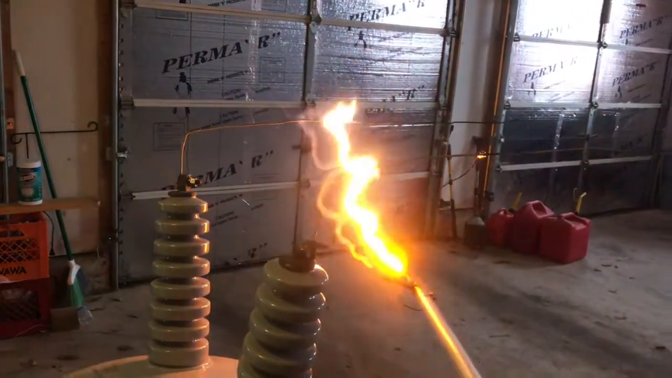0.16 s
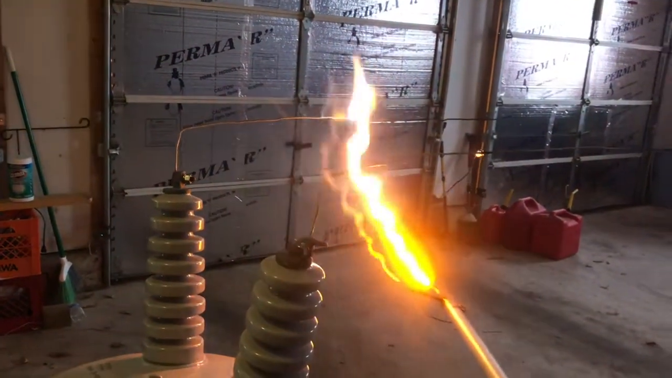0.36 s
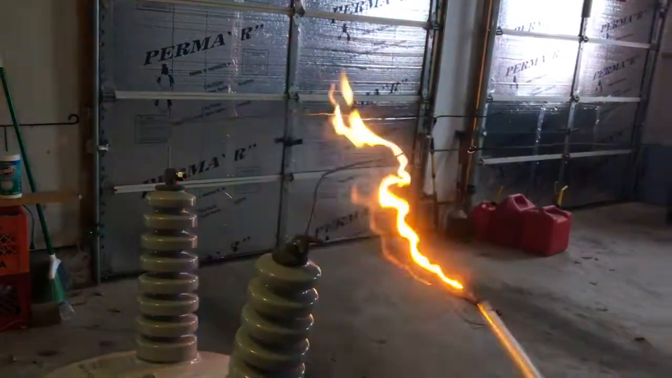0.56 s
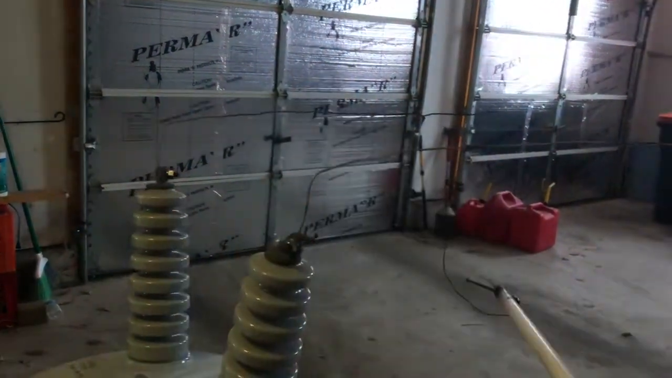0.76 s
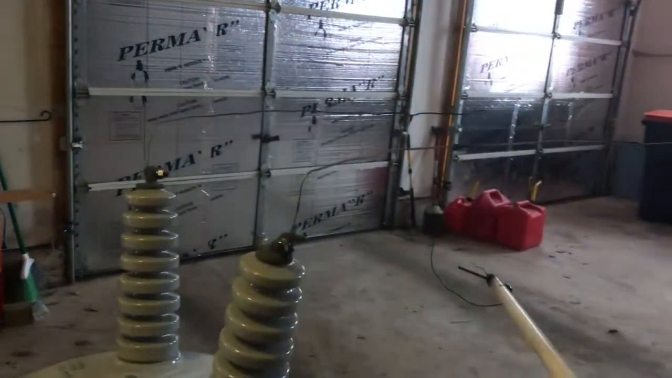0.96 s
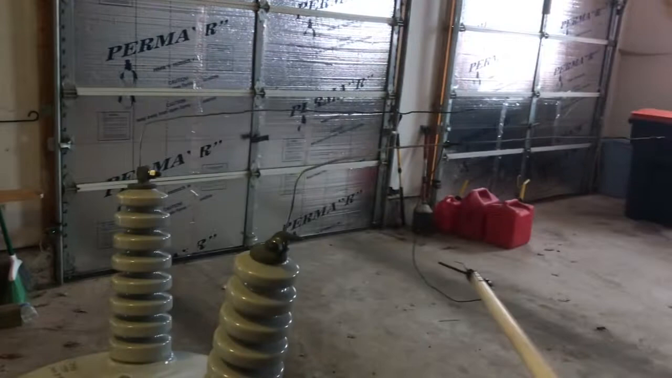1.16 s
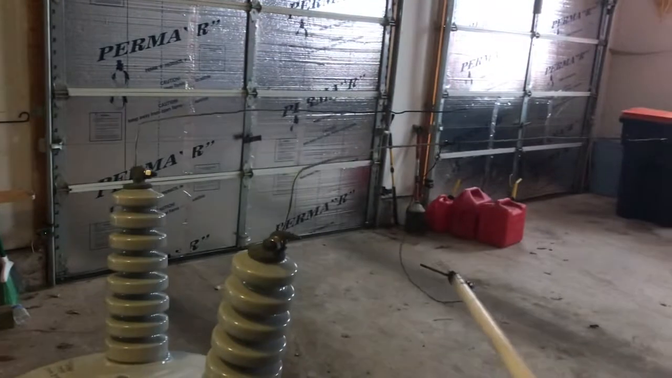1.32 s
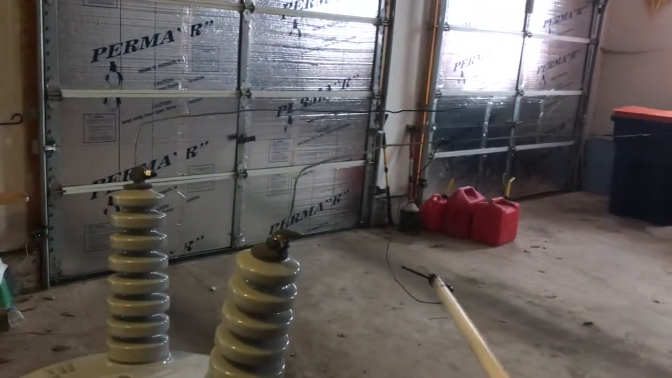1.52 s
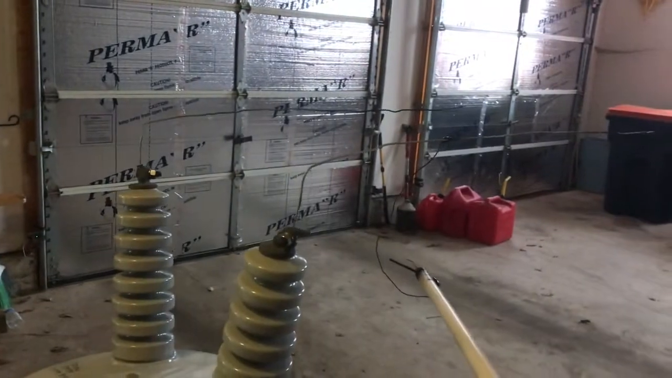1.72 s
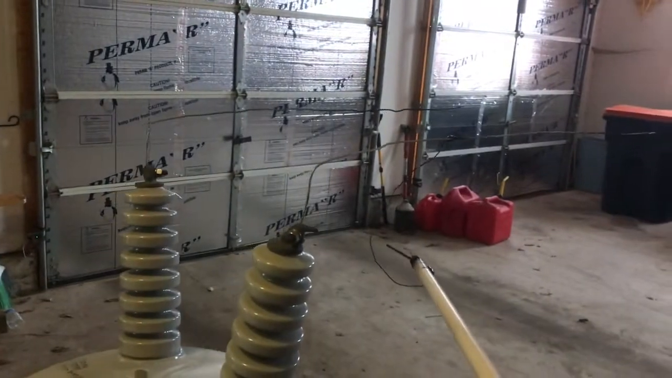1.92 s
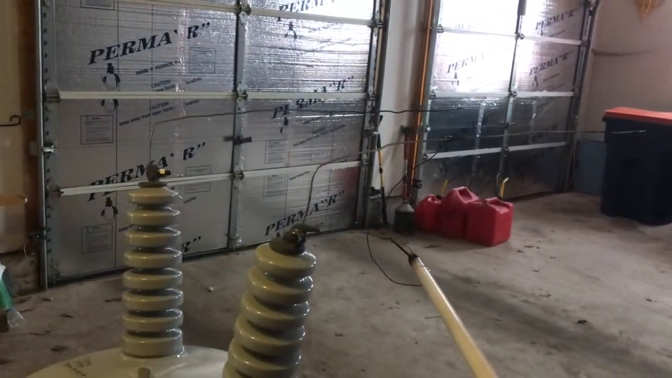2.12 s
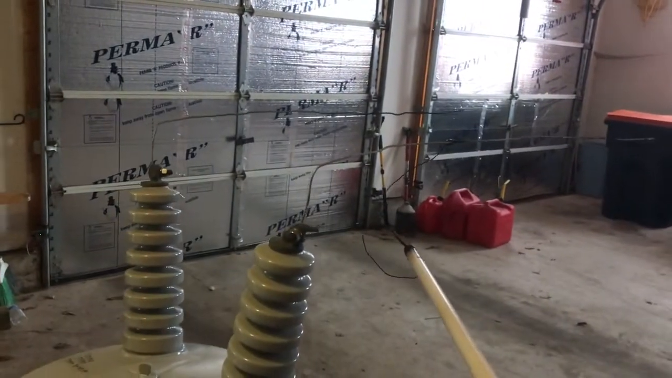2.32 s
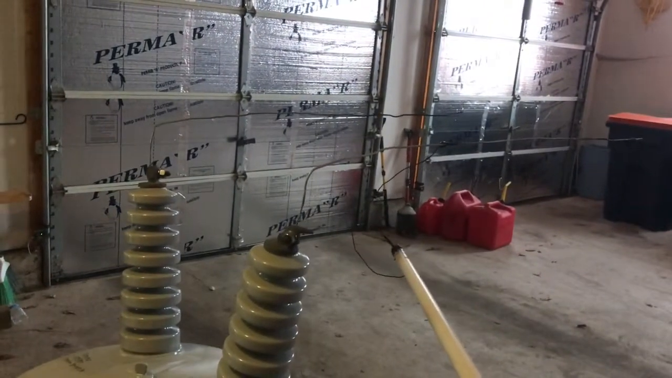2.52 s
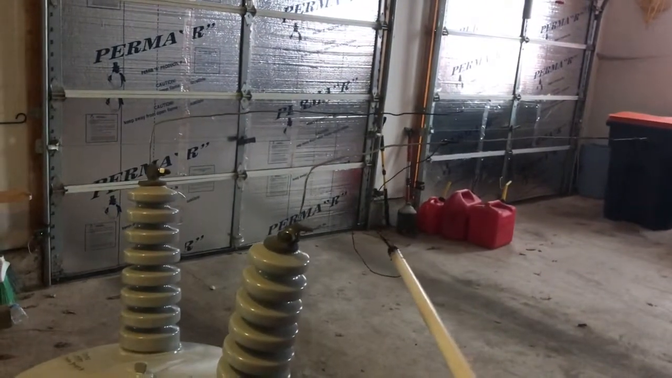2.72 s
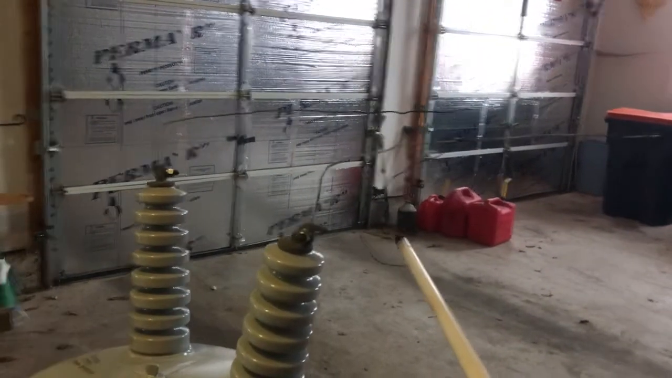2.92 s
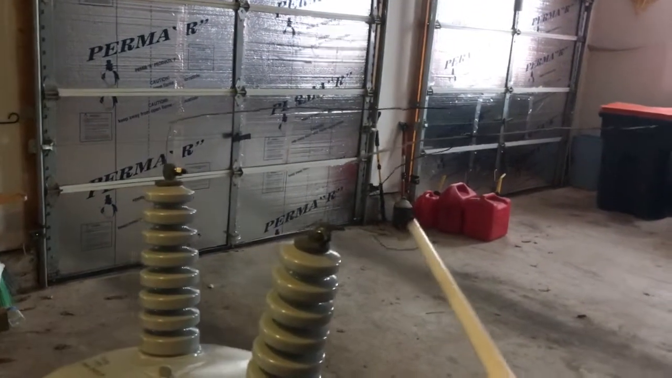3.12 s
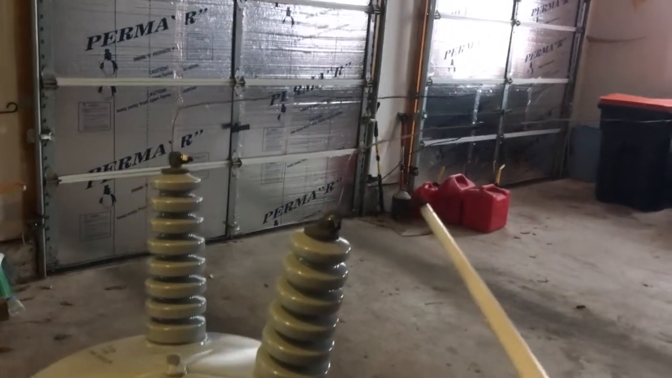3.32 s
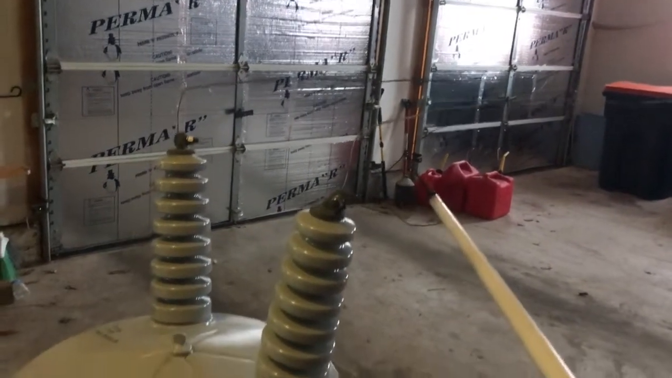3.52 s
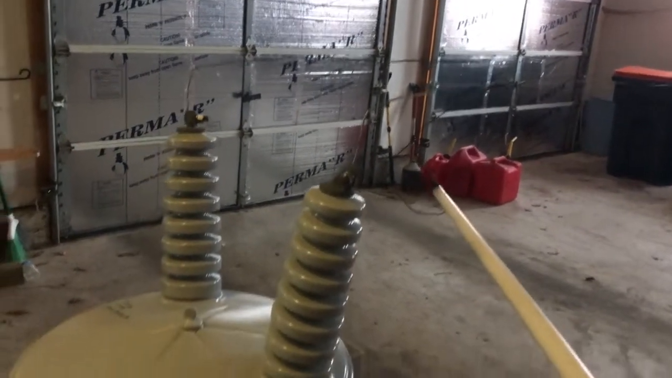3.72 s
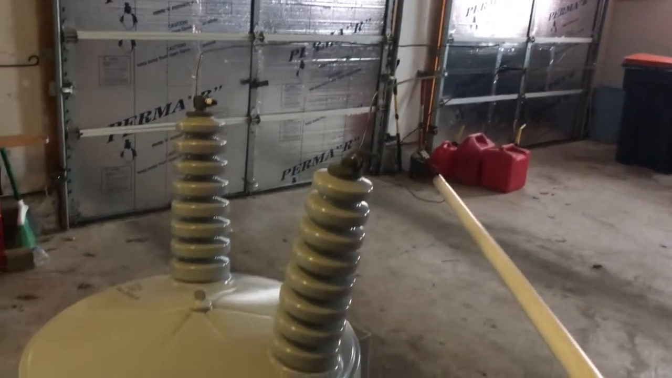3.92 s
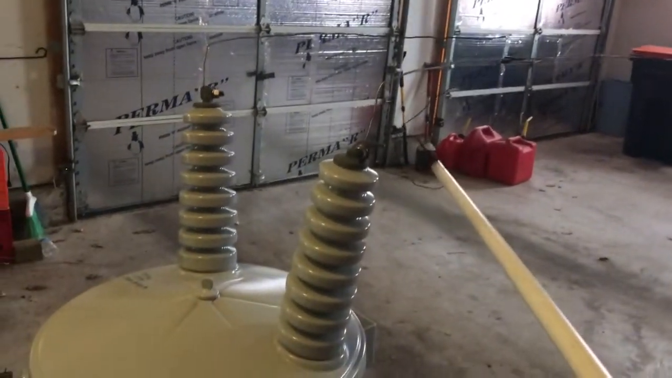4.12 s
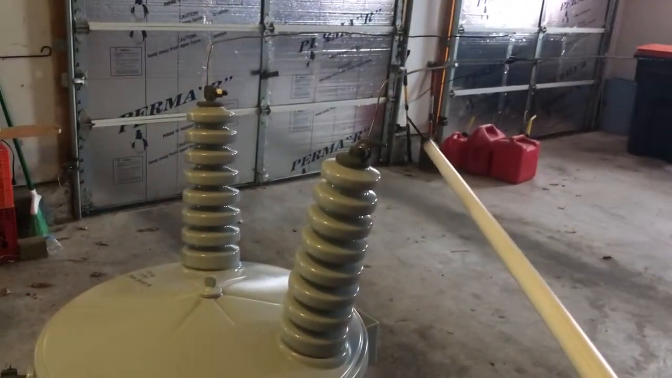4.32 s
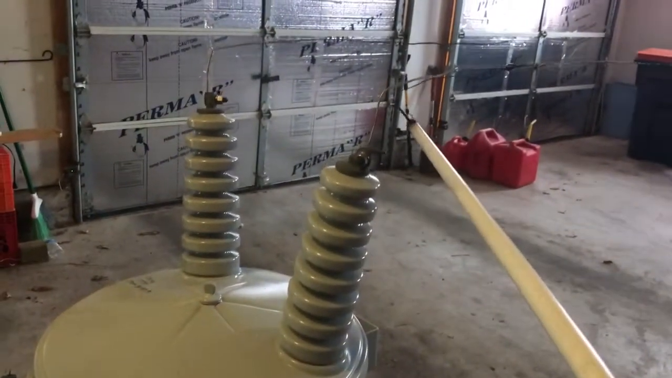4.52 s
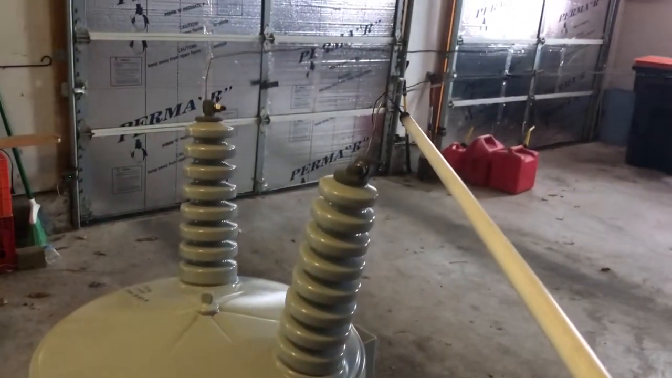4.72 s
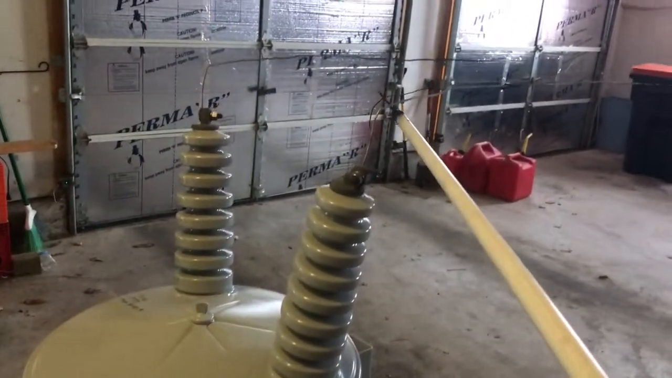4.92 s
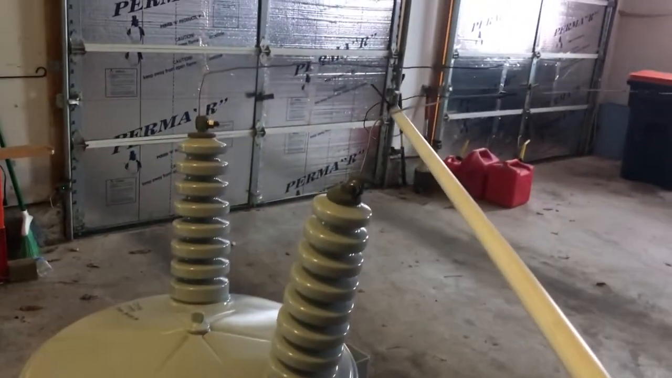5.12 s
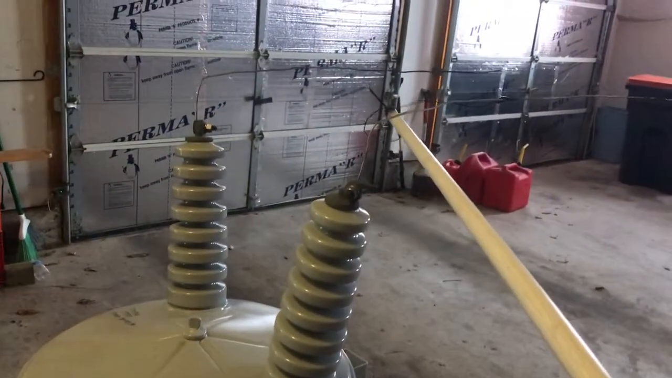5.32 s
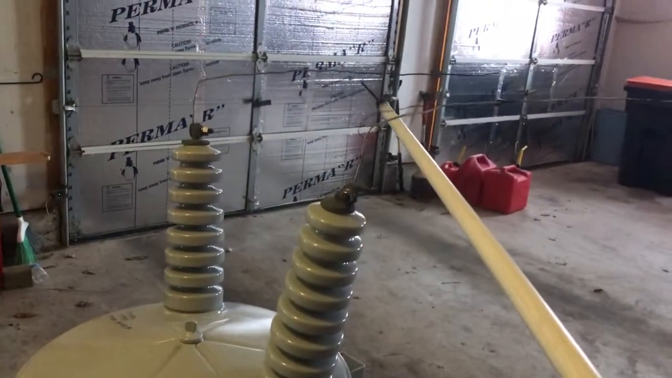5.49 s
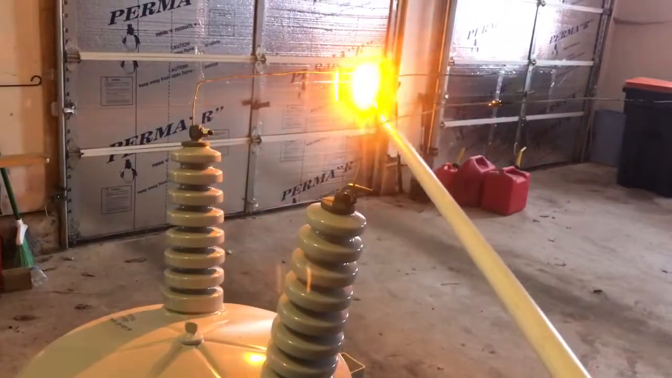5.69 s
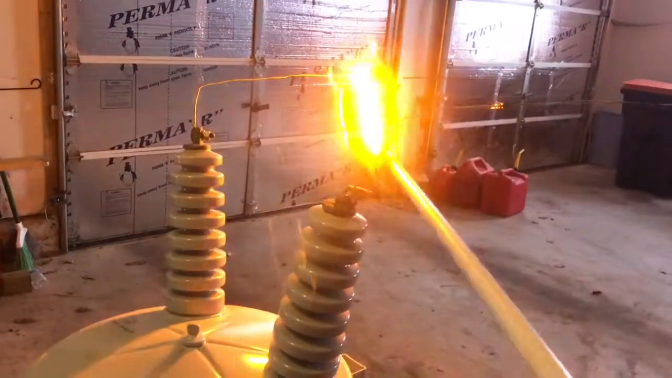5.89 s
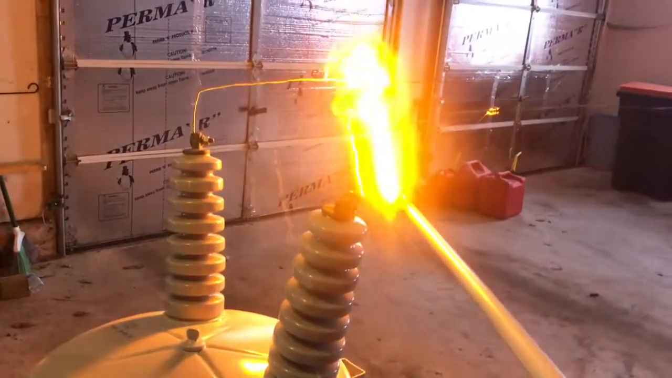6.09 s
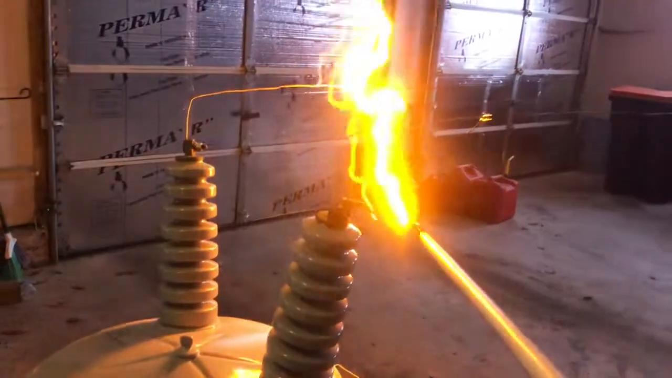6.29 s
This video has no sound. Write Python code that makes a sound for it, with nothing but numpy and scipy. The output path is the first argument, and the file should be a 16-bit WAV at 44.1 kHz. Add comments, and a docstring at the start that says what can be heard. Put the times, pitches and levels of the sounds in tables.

```python
"""A garage with a high-voltage transformer on 60 Hz mains: an arc drawn out with a long rod buzzes, roars and
breaks, its channel heating and re-igniting twice a cycle. The idle transformer hums and whines, the hand-held
microphone is bumped, the rod knocks once, and a few faint snaps and soft scuffs sound. Then a spark cracks
across the gap and a new arc swells as it is pulled longer."""
import sys
import numpy as np
from scipy import signal
from scipy.fft import rfft, irfft, next_fast_len
from scipy.io import wavfile

SR = 44100
rng = np.random.default_rng(int(sys.argv[2]) if len(sys.argv) > 2 else 0)


def waveform_to_disk(signal):
    """Save audio, clipped to [-1, 1], as 16-bit WAV at the path in sys.argv[1]."""
    frames = np.transpose(np.atleast_2d(signal))
    scaled = np.clip(frames, -1, 1) * 32767
    samples = np.round(scaled).astype(np.int16)
    wavfile.write(sys.argv[1], SR, samples)


N = 280035
TIME = np.arange(N) / SR
MAINS_HZ = 60


# first arc's rasp: mains_multiple, gain_db
BREAKING_OVERTONES = [(3, -14), (5, -24), (6, -1.5), (7, -24), (8, -9), (9, -12.5), (10, -3), (11, -17),
                      (12, -12.5)]
# its unrest: time_s, gain_db
UNREST = [(0.0, -33.5), (0.086, -37.5), (0.322, -28.5), (0.448, -34.5), (0.588, -27), (0.608, -33),
          (0.64, -32.5)]

def breaking_arc(break_s=0.66, cooling_s=0.02, ring_db=-7, ring_t60_s=0.83):
    """A long arc roars more as it rasps more, then breaks and cools; its buzz rings on in the room."""
    burning = dying(break_s, cooling_s)
    ring = from_db(ring_db) * (dying(break_s, ring_t60_s / np.log(1000)) - burning)
    times_s, gains_db = np.transpose(UNREST)
    unrest_db = np.interp(TIME, times_s, gains_db)
    cycles = MAINS_HZ * (TIME - .0052)   # counted from a current zero
    hum = from_db(-25.3) * (burning - ring)   # nulls as the opposed ring takes over
    octave = from_db(-29) * (burning + ring)
    rasp = from_db(-5.5 + unrest_db) * (burning + ring)
    buzz = arc_buzz(cycles, hum, octave, rasp, BREAKING_OVERTONES, octave_lag_s=0.00068, waver_db=4.5)
    roar = from_db(-37 + 0.23 * (unrest_db - gains_db.mean()))
    plasma = arc_plasma(cycles, roar, sizzle=from_db(-60.5), sharpness=0.46, top_hz=8500)
    ticks = reignition_ticks(cycles, gain_db=-32.5, reverse_db=-9)
    return buzz, burning * (plasma + ticks)


# second arc's rasp: mains_multiple, gain_db
PULLED_OVERTONES = [(6, -4), (8, -13), (10, -5), (12, -20), (14, -26)]
STRIKE_S = 5.6486

def pulled_arc(gap_share=0.027, pull_start_s=5.768, pull_takes_s=0.6):
    """Pulled at steady speed: hum grows with length, rasp more slowly, roar faster; sizzle holds."""
    lit = TIME > STRIKE_S
    length = lit * (gap_share + np.maximum(TIME - pull_start_s, 0) / pull_takes_s)
    cycles = MAINS_HZ * (TIME - .0023)
    hum, octave = from_db(-26) * length, from_db(-33) * length
    rasp = from_db(-35.5) * length ** 0.78
    buzz = arc_buzz(cycles, hum, octave, rasp, PULLED_OVERTONES,
                    octave_lag_s=0.00033, waver_db=2.1, rasp_lead_s=.0012)
    roar = from_db(-43.5) * length ** 1.55
    plasma = arc_plasma(cycles, roar, sizzle=from_db(-55.5), sharpness=0.87, top_hz=19000)
    ticks = reignition_ticks(cycles, gain_db=-24.5, reverse_db=-21)
    return buzz, lit * (plasma + ticks)


def arc_buzz(cycles, hum, octave, rasp, overtones, octave_lag_s, waver_db, rasp_lead_s=0):
    """The channel heats and swells twice a cycle; its writhing wavers overtone level and phase."""
    phase = 2 * np.pi * (cycles - 1 / 4)   # pressure peaks a quarter cycle after current zero
    rasp_phase = phase + 2 * np.pi * MAINS_HZ * rasp_lead_s   # steep rise before that peak
    octave_phase = phase - 2 * np.pi * MAINS_HZ * octave_lag_s
    tone = hum * np.cos(2 * phase) + octave * np.cos(4 * octave_phase)
    for multiple, db in overtones:
        gain = rasp * from_db(db + waver_db * drift(25.02))
        tone += gain * np.cos(multiple * rasp_phase + waver_db / 6 * drift(10.05))
    return np.sqrt(2) * tone


# plasma noise spectra: freq_hz, density_db
ROAR_SPECTRUM = [(40, -19), (90, -4.5), (180, 7.5), (400, -1), (650, -2), (1000, -1), (1400, -4.5),
                 (2000, -12.5), (2600, -13), (3100, -20), (6000, -26), (16000, -38.5)]
SIZZLE_SPECTRUM = [(500, -39), (2000, -1.5), (5000, 0), (9000, 0.5), (12000, -5), (16000, -24)]

def arc_plasma(cycles, roar, sizzle, sharpness, top_hz, flicker_db=3.5):
    """The hot channel roars and sizzles in flickering bursts, two per cycle."""
    phase = 2 * np.pi * (cycles - 1 / 4)
    bursts = np.exp(sharpness * np.cos(2 * phase + 1.17)) * from_db(flicker_db * drift(110))
    roaring = noise(ROAR_SPECTRUM, bursts)
    sizzling = noise(SIZZLE_SPECTRUM, bursts * from_db(2 * drift(550)))
    return roar * roaring + sizzle * rms_one(band(sizzling, 500, top_hz, order=1))


# spells of hard re-ignition: centre_s, rise_db, half_width_s
SPITTING_SPELLS = [(.163, 19, 0.017), (.27, 8.5, 0.022), (.445, 16.5, 0.056), (6.085, 9, 0.053),
                   (6.26, 12.5, 0.031)]

def reignition_ticks(cycles, gain_db, reverse_db):
    """The arc re-ignites after each current zero, much harder on one polarity."""
    half_cycle = np.floor(2 * cycles)
    impulses = np.diff(half_cycle, prepend=half_cycle[0])
    tick_db = gain_db + humps(SPITTING_SPELLS) + reverse_db * (half_cycle % 2)
    return band(impulses * from_db(tick_db + 2 * rng.standard_normal(N)), 5600, 17000, order=1)


def strike(corona_db=-55, corona_half_s=.04):
    """The gap fizzes and breaks down: a bright crack, a thud of heated air -> (direct, room send)."""
    fizz = rms_one(band(rng.standard_normal(N), 1500, 12000, order=1))
    corona = from_db(corona_db) * (np.abs(TIME - STRIKE_S) < corona_half_s) * fizz
    crack = snaps([(STRIKE_S, 2.5, 9800)], spread=1.56, room_db=4)
    thud = snaps([(STRIKE_S, -17.5, 430)], spread=5, room_db=4.5)
    return corona + crack + thud


# sparks in the gap and along the arcs: start_s, level_db, centre_hz
ARC_SPARKS = [(.065, -9.5, 2950), (.1473, -18, 2690), (.4242, -14.5, 5000), (.4723, -18.5, 6400),
              (.4981, -16, 1210), (.6139, -10.5, 3220), (5.6064, -25.5, 3620), (5.6228, -25, 3900),
              (5.6388, -23.5, 5300), (5.6523, -6, 7800), (5.6632, -7, 10000), (5.6847, -6, 8700),
              (6.104, -21, 1390), (6.262, -4.5, 1980)]
# faint snaps and soft scuffs while the arc is out: start_s, level_db, centre_hz
FAINT_SNAPS_AND_SCUFFS = [(1.3657, -39.5, 1500), (2.0235, -38, 5170), (2.536, -39.5, 2180), (2.615, -41, 1400),
                          (2.8977, -36.5, 547)]

def sparks_and_snaps():
    """Sparks crack around the arcs; faint snaps and soft scuffs sound between them -> (direct, room send)."""
    return snaps(ARC_SPARKS, spread=2.26, room_db=-4) + snaps(FAINT_SNAPS_AND_SCUFFS, spread=1.84, room_db=0.5)


def snaps(rows, spread, room_db, crackle_gain=0.088, crackle_s=0.0016):
    """Pressure spikes, each with a brief crackle behind it -> (direct, room send)."""
    direct, send = np.zeros((2, N + SR))
    t = TIME[:SR // 20]
    for start_s, db, centre_hz in rows:
        low_hz, high_hz = centre_hz / spread, centre_hz * spread
        burst = crackle_gain * rng.standard_normal(len(t)) * np.exp(-t / crackle_s)
        parts = band(np.array([t == 0, burst]), low_hz, high_hz, order=1)
        spike, crackle = band(parts, low_hz / 3, high_hz * 2)
        gain = 1.58 * from_db(db) / np.linalg.norm(spike)
        at = round(start_s * SR)
        direct[at:at + len(t)] += gain * (spike + crackle)
        send[at:at + len(t)] += gain * spike * from_db(room_db)
    return np.array([direct[:N], send[:N]])


# idle hum and faint whine: pitch_hz, level_db
IDLE_TONES = [(60, -65.5), (120, -69), (240, -73), (360, -77.5), (3241, -84), (3722, -83.5), (6992, -82),
              (7083, -87), (7203, -85.5), (7323, -84.5)]
# standing-wave tones: pitch_hz, level_db, fades (centre_s, depth_db, half_width_s)
WHINE_TONES = [(3470, -78, [(1.15, 15, 0.24), (2.3, 18, .35)]), (3591, -76.5, [(1.8, 12, 0.35),
               (4.0, 10, 0.4)])]
# tones under load: pitch_hz, level_db
LOAD_TONES = [(1080, -51), (1320, -64.5), (1920, -64), (2400, -60.5)]
# their swell: centre_s, gain_db, half_width_s
LOAD_SWELL = [(6.04, -3.5, .17)]

def transformer():
    """Hums, whines, and sings under load; two tones fade as the microphone passes their nodes."""
    whine = sum(from_db(-humps(fades)) * tones([(hz, db)], waver_db=1) for hz, db, fades in WHINE_TONES)
    idle = tones(IDLE_TONES, waver_db=2.5)
    singing = swells(LOAD_SWELL) * (TIME > STRIKE_S) * tones(LOAD_TONES, waver_db=6.5)
    return idle + whine + singing


# rod knock response: freq_hz, gain_db
ROD_RESPONSE = [(100, -2), (310, 2.5), (450, -4.5), (590, 7), (700, 0), (810, -10.5), (2500, -7),
                (5000, -6), (7000, 0.5), (9000, -5), (10500, -12), (15000, -16)]

def rod_knock(start_s=3.3295, level_db=-20, chatter_s=0.011, room_db=3):
    """The tip knocks, hollow with a metallic click, and chatters briefly -> (direct, room send)."""
    blow = np.arange(N) == round(start_s * SR)
    chatter = .16 * rng.standard_normal(N) * (TIME > start_s) * dying(start_s, chatter_s)
    body = coloured(blow, ROD_RESPONSE)
    gain = 1.59 * from_db(level_db) / np.linalg.norm(body)
    return gain * (body + coloured(chatter, ROD_RESPONSE)) / 2, gain * body * from_db(room_db)


# blows on the microphone body: peak_s, peak_db, pitch_hz, length_s
MIC_BUMPS = [(0.362, -30, 80, 0.019), (1.24, -45, 450, 0.0035), (1.259, -12, 105, 0.012),
             (2.299, -30, 113, 0.014), (2.318, -38.5, 377, 0.0028), (2.455, -17, 102, 0.0124),
             (2.614, -34.5, 120, 0.0144), (2.839, -41.5, 74, 0.015), (3.11, -37.5, 93, 0.017),
             (3.68, -29.5, 123, 0.018), (3.753, -40, 93, 0.017), (3.825, -35, 121, 0.026),
             (3.8567, -24, 98, 0.014), (4.282, -43.5, 81, 0.027), (4.484, -44, 91.5, 0.014),
             (4.623, -30, 115, .012), (5.053, -30.5, 155, 0.01), (5.104, -31.5, 87.4, 0.016),
             (5.438, -32, 328, 0.0033), (5.742, -45, 100, 0.015)]

def microphone_bumps(touch_lead_s=0.01384, touch_hz=257, touch_s=0.0076, scuff_db=-39):
    """After a light touch, each soft blow swings the body for a wave or two, with a faint scuff."""
    thumps, scuff_gain, t = np.zeros(N + SR), np.zeros(N), TIME[:SR // 10]
    touches = [(peak_s - touch_lead_s, min(-37.5 + 0.3 * db, db - 12.5), touch_hz, touch_s)
               for peak_s, db, _, _ in MIC_BUMPS]
    for peak_s, db, pitch_hz, length_s in MIC_BUMPS + touches:
        width_hz = 1.01 / length_s
        low_hz = np.sqrt(pitch_hz ** 2 + width_hz ** 2 / 4) - width_hz / 2
        body = signal.bessel(4, [low_hz, low_hz + width_hz], "band", norm="mag", fs=SR, output="sos")
        swing = signal.sosfilt(body, 1. * (t == 0))
        envelope = np.abs(signal.hilbert(swing))
        at = round(peak_s * SR) - envelope.argmax()
        thumps[at:at + len(t)] += from_db(db) * swing / envelope.max()
        from_onset_s = np.abs(TIME - at / SR)
        scuff_gain += from_db(db + scuff_db) * np.exp(-np.minimum(4 * from_onset_s / length_s, 20))
    return thumps[:N] + scuff_gain * rms_one(band(rng.standard_normal(N), 250, 750))


# grip shifts and rustles: centre_s, level_db, half_width_s
GRIP_SHIFTS = [(3.255, -47, 0.095), (3.55, -52.5, 0.086), (5.69, -50.5, 0.07)]
SLEEVE_RUSTLES = [(1.92, -68.5, 0.15), (2.25, -66.5, 0.094), (2.7, -69, 0.41), (3.2, -67.5, 0.061),
                  (3.65, -77, 0.23)]
# rustle spectrum: freq_hz, density_db
RUSTLE_SPECTRUM = [(100, 10.5), (600, 1.5), (1500, 1.5), (3000, -5.5), (7000, -6.5), (16000, -24)]

def handling():
    """The shifting grip rumbles, the microphone is bumped, sleeve and rod rustle."""
    rumble = swells(GRIP_SHIFTS) * rms_one(band(rng.standard_normal(N), 70, 125))
    bumps = microphone_bumps()
    rustle = swells(SLEEVE_RUSTLES) * noise(RUSTLE_SPECTRUM, from_db(4 * drift(40)))
    return rumble + bumps + rustle


# garage reverberation: freq_hz, t60_s
GARAGE_DECAY = [(100, 0.98), (300, 1), (1000, 0.95), (2500, 0.96), (5000, 0.86), (9000, 0.51),
                (15000, 0.39)]

def garage(send, earlier, build_s=0.0094):
    """Diffuse echoes build quickly and die, treble first; earlier sound still rings at the start."""
    t, hz = TIME[:SR], np.fft.rfftfreq(SR, 1 / SR)
    white, response = rfft(rng.standard_normal(SR)), np.zeros(SR)
    for band_hz, t60_s in GARAGE_DECAY:
        share = at_hz([(f, f == band_hz) for f, _ in GARAGE_DECAY], hz)
        response += irfft(white * share, SR) * from_db(-60 * t / t60_s)
    response *= 1 - np.exp(-t / build_s)
    echoes = signal.fftconvolve(np.concatenate([earlier, send]), response / np.linalg.norm(response))
    return echoes[len(earlier):][:N]


# room background: freq_hz, density_db
AIR_SPECTRUM = [(15, -37), (25, -18), (64, 1.5), (127, -14), (206, -17), (242, -21), (270, -18), (354, -23),
                (503, -29), (607, -26.5), (2760, -36.5), (3620, -33.5), (4030, -32), (7110, -37.5),
                (16000, -36.5)]

def room_air(level_db=-60):
    """Steady low rumble and faint hiss."""
    return from_db(level_db) * noise(AIR_SPECTRUM)


def from_db(db):
    """Decibels to gain."""
    return 10 ** (np.asarray(db) / 20)


def rms_one(x):
    """Scale to unit power."""
    return x / np.sqrt(np.mean(x ** 2) + 1e-20)


def at_hz(points, hz):
    """Read a table on a log-frequency axis."""
    freqs_hz, values = np.transpose(points)
    return np.interp(np.log(np.maximum(hz, 1)), np.log(freqs_hz), values)


def coloured(x, points):
    """Minimum-phase filter from (freq_hz, gain_db) points."""
    size = 2 * next_fast_len((N + SR) // 2)
    gain = from_db(at_hz(points, np.fft.rfftfreq(size, 1 / SR)))
    cepstrum = irfft(np.log(gain))
    cepstrum[1:size // 2] *= 2
    cepstrum[size // 2 + 1:] = 0
    return irfft(rfft(x, size) * np.exp(rfft(cepstrum)))[:N]


def band(x, low_hz, high_hz, order=2):
    """Butterworth band-pass."""
    high_hz = min(high_hz, .45 * SR)
    edges_hz = [min(low_hz, high_hz / 2), high_hz]
    return signal.sosfilt(signal.butter(order, edges_hz, "band", fs=SR, output="sos"), x)


def noise(spectrum, gate=1):
    """Gated, coloured noise at unit rms."""
    return rms_one(coloured(gate * rng.standard_normal(N), spectrum))


def drift(rate_hz):
    """Ramps between random values."""
    return np.interp(TIME * rate_hz, np.arange(4000), rng.standard_normal(4000))


def tones(rows, waver_db):
    """Sum of (pitch_hz, level_db) sines, each slowly wavering in level."""
    return np.sqrt(2) * sum(
        from_db(db + waver_db * drift(3.08)) * np.sin(2 * np.pi * (hz * TIME + rng.random()))
        for hz, db in rows)


def humps(rows):
    """Sum of (centre_s, height, half_width_s) bell curves."""
    return sum(height * np.exp(-np.minimum(((TIME - centre_s) / half_width_s) ** 2, 50))
               for centre_s, height, half_width_s in rows)


def swells(rows):
    """Gain curve from humps with heights in dB."""
    return humps((centre_s, from_db(db), half_width_s) for centre_s, db, half_width_s in rows)


def dying(start_s, decay_s):
    """One until start_s, then exponential decay."""
    return np.exp(-np.clip((TIME - start_s) / decay_s, 0, 30))


def scene():
    """Two arcs and their sparks over the transformer, handling noise and the quiet garage."""
    buzz, plasma = np.add(breaking_arc(), pulled_arc())
    hum = transformer()
    hits, hits_send = sparks_and_snaps() + strike() + rod_knock()
    plasma_send = from_db(-3.5) * plasma
    echoes = garage(hits_send + plasma_send, earlier=plasma_send[:SR // 8])   # arc already burning
    return (buzz + plasma + hum + hits + echoes + handling() + room_air())[None]


# microphone response: freq_hz, gain_db
MIC_RESPONSE = [(1900, 0), (2550, 2), (3000, -4.5), (3500, -1), (4700, -4), (5800, 0.5), (7800, -3),
                (8800, 3), (10400, -5), (13000, -2), (16000, -9.5)]
CUTOFF_HZ = 16350

def record(dry):
    """The microphone colours the treble, peaks are rounded, the top is cut."""
    rounded = np.tanh(coloured(dry[0], MIC_RESPONSE))
    low_pass = signal.ellip(10, .1, 80, CUTOFF_HZ, fs=SR, output="sos")
    return signal.sosfilt(low_pass, rounded)[None]


dry = scene()
out = record(dry)
waveform_to_disk(out)
```